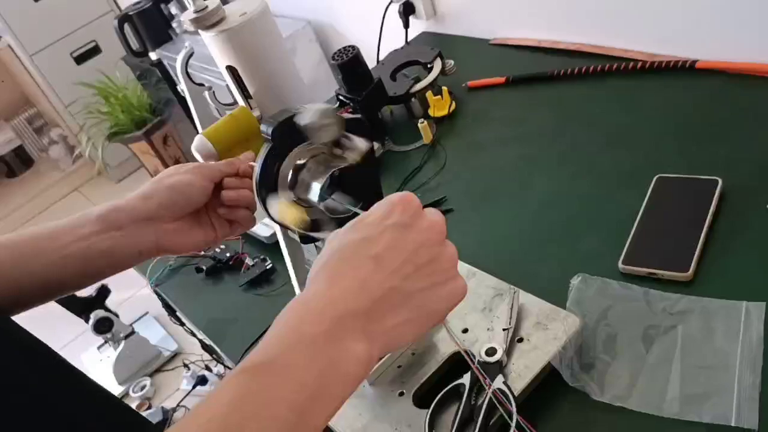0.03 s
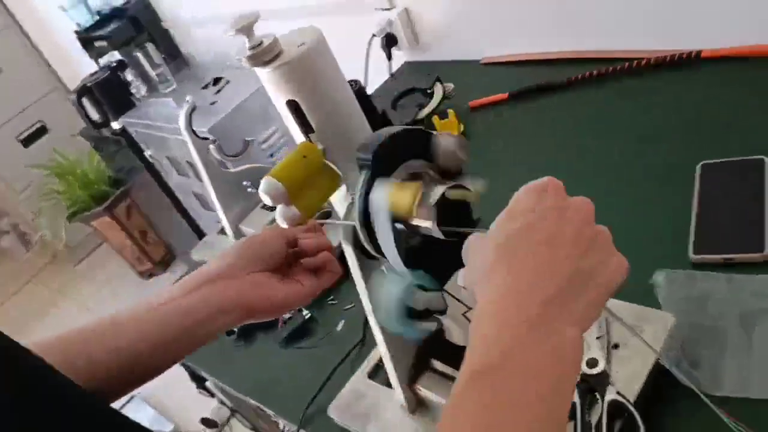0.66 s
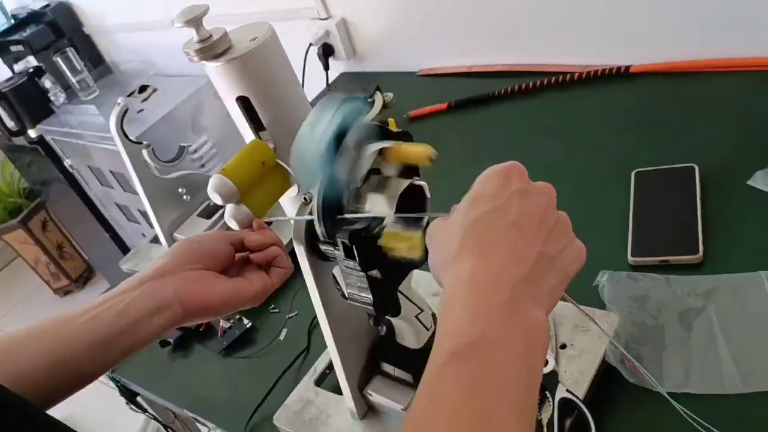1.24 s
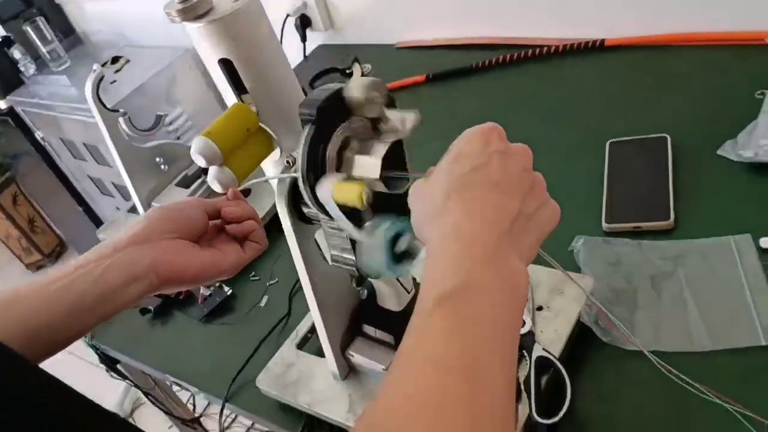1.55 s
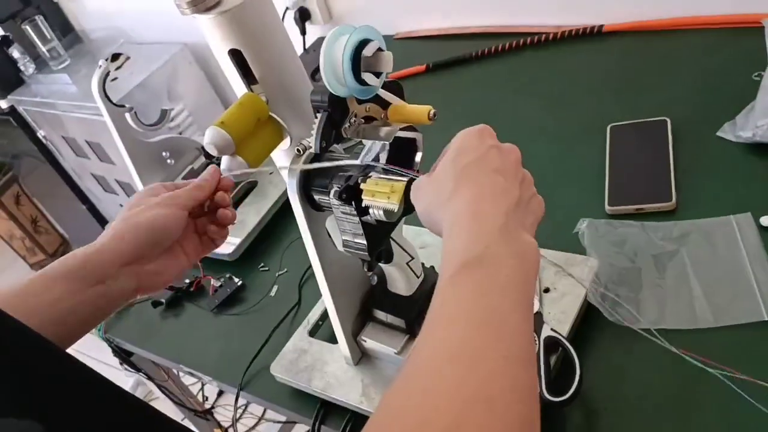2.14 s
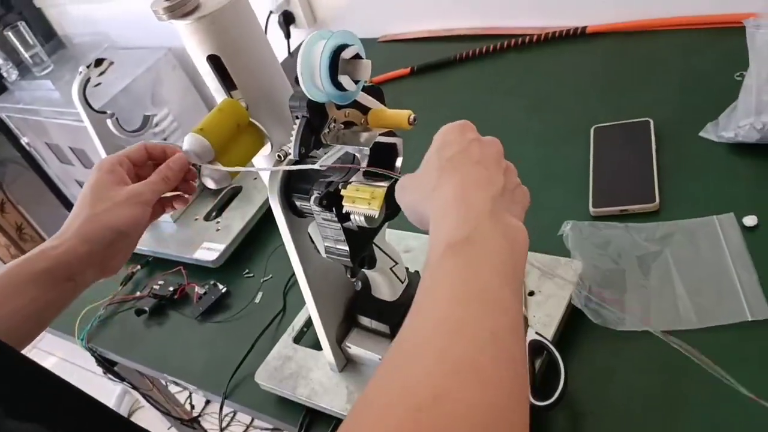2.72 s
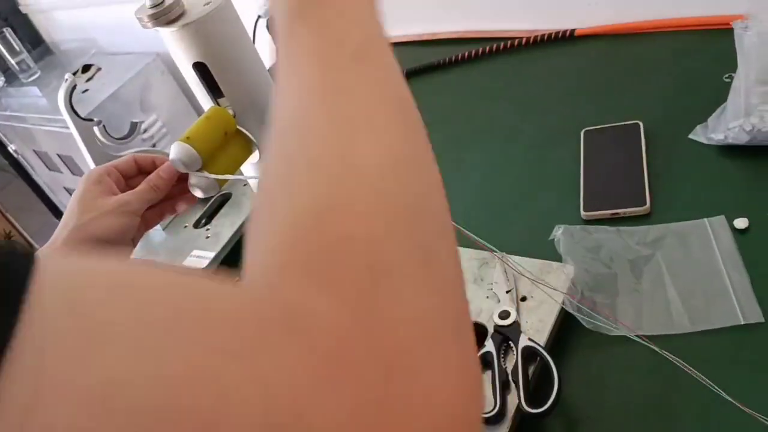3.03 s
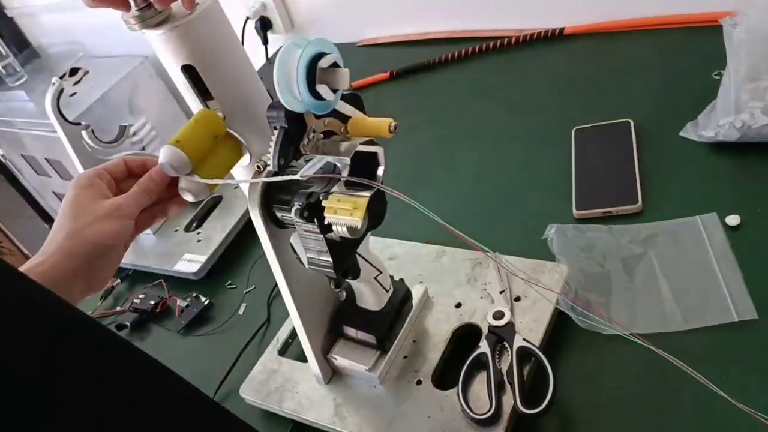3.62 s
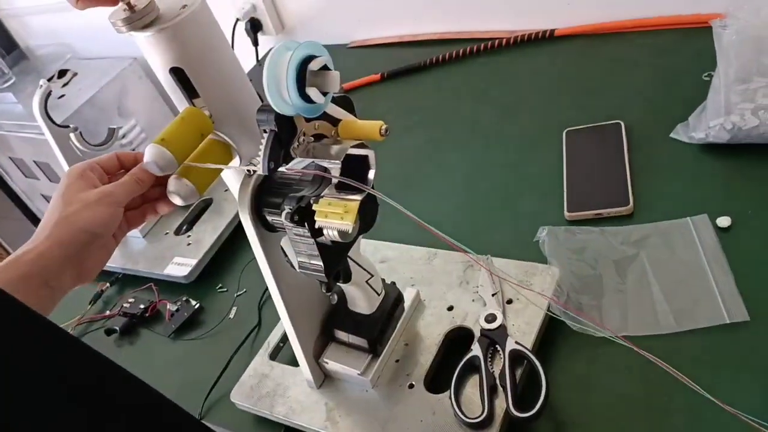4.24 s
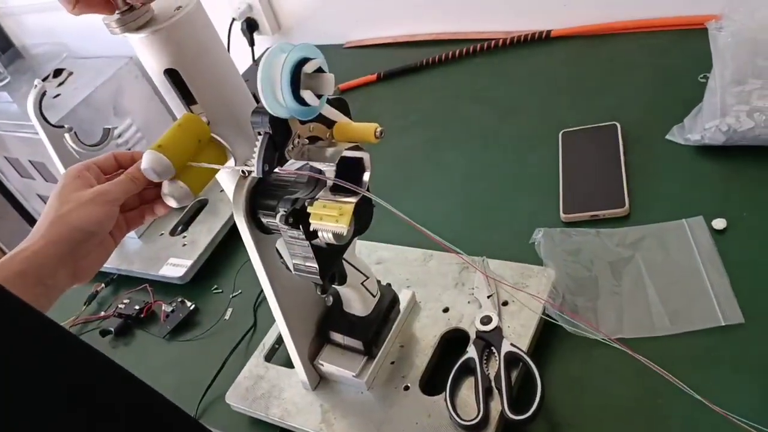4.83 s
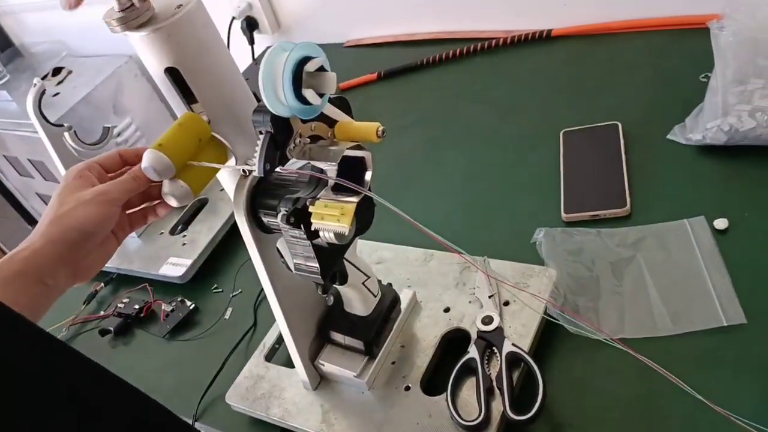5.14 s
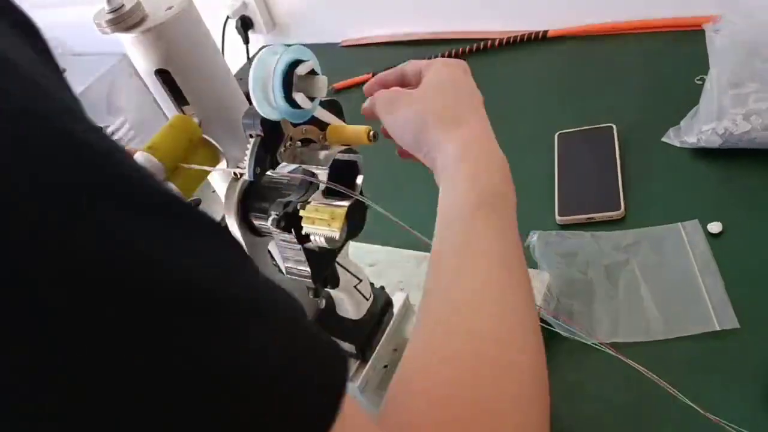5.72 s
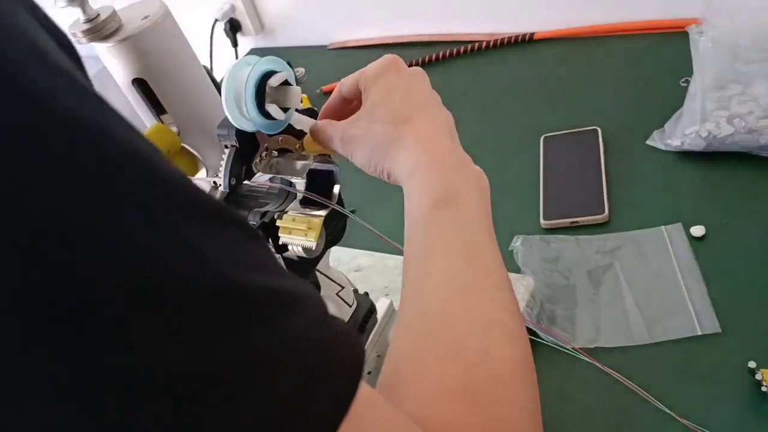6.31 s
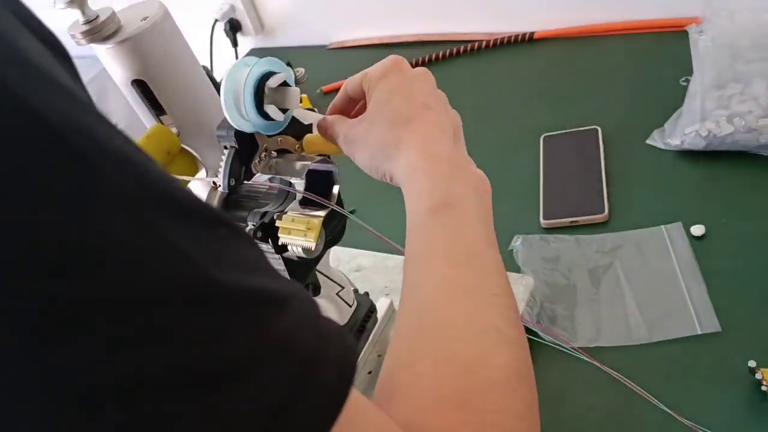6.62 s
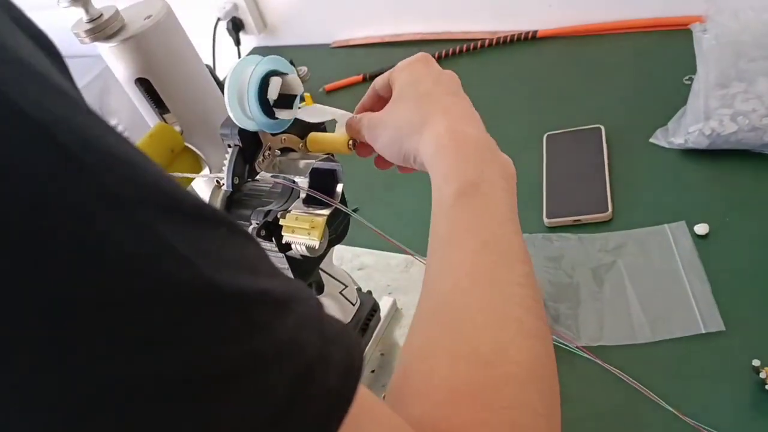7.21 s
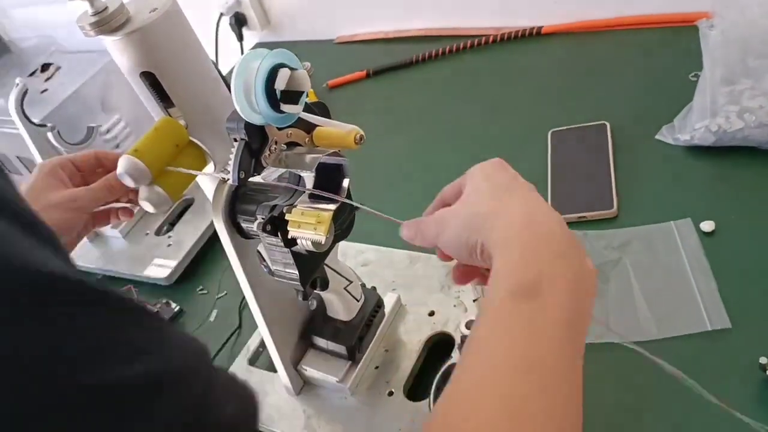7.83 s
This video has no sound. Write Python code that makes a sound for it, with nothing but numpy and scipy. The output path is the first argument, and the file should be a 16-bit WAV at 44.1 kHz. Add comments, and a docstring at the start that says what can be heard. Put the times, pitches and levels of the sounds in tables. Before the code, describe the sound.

Close by in a workshop, a motorised tape winder runs in one loud, short burst, its gears chattering and its tape crackling in pulses. It winds down and clacks to a stop, ringing briefly in the room. The rest is much quieter handling: wire and tape rasping, a few metallic ticks, one heavy clatter, then rubbing and dull bumps on the workbench above a faint machine drone.

```python
"""A small tape winder whirs on a workbench: gear teeth rattle its frame, the motor whines,
and tape crackles off the roll. It slows, stops with a clack, and its noise dies away in the room.
Wire and tape rasp by stick-slip friction; something heavy clatters down and the workshop reverberates.
Scuffs, ringing ticks of the tape arm and soft thumps of the bench sound over far machinery."""
import sys
import numpy as np
from scipy import signal
from scipy.fft import rfft, irfft
from scipy.io import wavfile

SR = 44100
rng = np.random.default_rng(int(sys.argv[2]) if len(sys.argv) > 2 else 0)


def file_out(sig):
    """Save sig as 16-bit WAV at sys.argv[1]."""
    # one column per channel
    cols = np.atleast_2d(sig).T
    # limit, then scale
    lim = np.clip(cols, -1, 1)
    pcm = np.round(lim * 32767).astype(np.int16)
    wavfile.write(sys.argv[1], SR, pcm)


N = 347067
TIME = np.arange(N) / SR
BINS = np.fft.rfftfreq(8192, 1 / SR)

# rotation of the motor shaft: time_s, turns_per_s
SHAFT_SPEED = [(.39, 38.36), (1.0, 37.5), (1.09, 34.5), (1.16, 21.8), (1.33, 19.6)]
# tones of motor and gears: shaft_multiple, level_db
MOTOR_ORDERS = [(3, -44.5), (4, -51), (8, -51), (16, -58), (20, -53.5), (24, -51), (28, -59), (32, -49),
                (40, -45.5), (48, -40.5), (61, -41.5), (80, -41.5)]
# the winding head hits its stop: start_s, level_db
STOP_CLACKS = [(1.3201, -66), (1.3215, -42), (1.335, -48), (1.338, -54.5)]
# spectral envelopes of the sources: frequency_hz, relative_db
FRAME_SPECTRUM = [(30, -38.5), (60, -39), (110, -11), (170, -12), (235, -21.5), (305, -10.5), (410, -24.5),
                  (660, -24), (880, -10.5), (1310, -12), (1770, -6), (2350, -0.5), (3500, -6.5),
                  (5740, -24), (7000, -27), (9100, -44), (15000, -100)]
PEEL_SPECTRUM = [(2940, -36), (5000, -6), (7140, -10.5), (7890, -7.5), (8950, 2.5), (9410, 1.5),
                 (12000, -15), (12400, -23.5), (12500, -38), (16200, -67.5), (22000, -120)]
CLATTER_SPECTRUM = [(25, -43), (60, -14.5), (100, -13.5), (180, -13), (320, -11), (490, -5), (700, -14),
                    (1500, -9), (2700, -2.5), (3200, -8.5), (4000, -25), (5200, -40), (7500, -48.5),
                    (9400, -42), (12000, -74.5)]
RUB_SPECTRUM = [(47, -35.5), (90, -7.5), (150, -10.5), (240, -1.5), (470, -5.5), (700, -9), (1000, -6),
                (1500, -8), (2800, -4), (3250, -10.5), (4100, -24), (5600, -35), (7800, -38), (9400, -26.5),
                (11900, -49)]
SHOP_SPECTRUM = [(24, -55), (40, -19), (112, -3), (169, -12), (243, -2.5), (301, -9), (356, -17),
                 (499, -11), (549, -16.5), (1160, -14), (1510, -20), (2560, -20.5), (5010, -45),
                 (9600, -41), (12500, -46.5), (16200, -70.5), (22000, -120)]
# resonances: centre_hz, width_hz, lift_db
FRAME_MODES = [(1155, 100, 6.5), (1780, 60, 6), (2230, 23, 3.5), (2353, 70, 6), (2990, 50, 1),
               (3004, 99, 4.5), (3600, 680, 3), (4420, 400, 6)]
MOUNT_MODE = (340, 37, 22)
CLATTER_MODES = [(196, 26, 7.5), (510, 50, 5.5), (880, 93, 5.5), (2012, 50, 0), (2436, 26, -1),
                 (2753, 120, 3.5)]
TAUT_TAPE_MODE = (2600, 1300, 5)
SHOP_MODES = [(227, 40, 1.5), (1120, 98, 0.5)]
# rebounds of the heavy object: start_s, level_db, bass_db
BOUNCES = [(3.579, -51, 7), (3.62, -44.5, -3), (3.634, -49.5, -10), (3.785, -64.5, 11), (3.86, -66, 15)]
# the winder's noise dying away in the room after the stop (first row), then light rasps of tape
# and wire: start_s, level_db, rise_s, bass_db, fizz_db
TAIL_AND_RASPS = [(1.36, -44, 0.1, -6.5, 10), (1.729, -42, 0.036, -12.5, 15),
                  (1.869, -52, 0.0093, -5, 22.5), (1.965, -45, 0.013, -6.5, 10.5),
                  (2.12, -53.5, 0.0082, -4, 8), (2.286, -58, 0.012, -18, 26), (2.38, -57, 0.014, -13, 5),
                  (2.527, -41.5, 0.047, -4, 11), (2.705, -49.5, .02, -4, 9.5), (2.835, -50, 0.046, 1, 9.5),
                  (3.08, -58.5, 0.0079, -2, 11.5), (7.77, -83.5, .02, -5, 33.5)]
# hands and parts rubbing the bench: start_s, level_db, rise_s, bass_db, hollow_hz
SCUFFS = [(3.316, -50.5, .008, -10, 450), (3.397, -51, 0.039, 9.5, 332), (3.981, -54.5, 0.0071, -11, 446),
          (4.151, -55.5, 0.023, -3, 411), (4.709, -53, 0.0095, 9, 720), (4.745, -54, 0.016, 8.5, 650),
          (4.943, -47, 0.033, 4.5, 330), (5.02, -48, 0.021, 3, 242), (5.262, -53.5, 0.019, 2, 700),
          (5.531, -49, 0.032, -1, 248), (5.6, -50, .07, 5, 363), (5.74, -46.5, 0.059, 3.5, 355),
          (5.86, -50.5, .04, -1, 247), (6.584, -44, 0.039, -0.5, 247), (7.298, -67.5, 0.014, 5.5, 453)]
# snaps of the tape arm: start_s, level_db, ping_lift_db
ARM_TICKS = [(2.878, -44, -1), (3.321, -57, -2), (4.198, -58, -7), (4.271, -51, -9), (4.346, -54.5, 6),
             (7.561, -76, 8.5)]
# free vibrations of that arm: pitch_hz, relative_db, t60_s
ARM_MODES = [(1430, 0, .075), (1543, 5, 0.038), (2420, -14, .05), (2865, 3.5, 0.039), (5900, -28.5, 0.298),
             (10350, -29, .08)]
# soft pushes on the bench, and the low boom of the heavy object landing (3.572 s row): start_s, level_db,
# pitch_hz
BENCH_THUMPS = [(1.324, -31, 158.2), (2.873, -39, 220.4), (3.572, -29, 174.4), (4.342, -41, 115.5),
                (4.733, -45, 138), (4.791, -51, 100), (5.506, -35, 108.6), (5.544, -30, 108),
                (5.594, -34, 99.6), (6.68, -40.5, 239)]
# course of the background noise: time_s, level_db, treble_db
SHOP_LEVELS = [(1.7, -57.5, 4), (2.4, -63, 9.5), (3.2, -57.5, 3), (4.6, -62.5, 3), (5.45, -60.5, 7),
               (6.15, -63.5, 4.5), (6.5, -58.5, 1.5), (7.15, -63.5, -3.5), (7.87, -65, -6.5)]
# reverberation time of the workshop: frequency_hz, t60_s
ROOM_DECAY = [(100, 1.1), (500, 0.8), (2000, 0.86), (4000, 0.65), (9000, 0.49)]

START_S, STOP_S = .389, 1.345  # the motor's run
# level at the start, change per halving of speed, change with running time
GEAR_DB, GEAR_SLOW_DB, GEAR_EASE_DB_PER_S = -22, -2, -6.5
PEEL_DB, PEEL_SLOW_DB, PEEL_EASE_DB_PER_S = -35, -8.5, -3.5
# the head turns once in GEAR_RATIO shaft turns and tugs the tape each time
GEAR_RATIO, FIRST_TUG_S, TUG_DB, TUG_WIDTH_TURNS = 8.25, 0.4746, 5.5, 0.086
# the heavy object lands corner after corner, each harder and deeper than the last
LANDING_S, CORNER_GAP_S = 3.4617, .0057
FIRST_CORNER_DB, CORNER_GROWTH_DB, FIRST_BASS_DB, BASS_STEP_DB = -47, 4, -7, 1.7
# a stroke that swells for SWELL_S has a decay time of STROKE_T60_S; slower ones linger by a power law
SWELL_S, STROKE_T60_S, LINGER_POWER = 0.025, 0.59, .25


def winder(mesh_depth=0.32, periodic_share=0.25, wander=.005, wet_db=-8, jerk_db=-13, uneven_db=.7):
    """Forced vibration: tooth impacts drive the frame while the motor whines and peeling tape crackles."""
    speed, = follow(SHAFT_SPEED)
    halvings = np.log2(speed.max() / speed)
    run_s = np.clip(TIME, START_S, STOP_S) - START_S
    running = np.clip((TIME - START_S) / 0.0027, 0, 1) * np.clip((STOP_S - TIME) / 0.019, 0, 1)
    speed = speed * (1 + wander * drift(rate_hz=35))
    turns = np.cumsum(speed) / SR
    head_turns = (turns - np.interp(FIRST_TUG_S, TIME, turns)) / GEAR_RATIO
    tug = np.exp(-((head_turns - np.round(head_turns)) / TUG_WIDTH_TURNS) ** 2)
    gear_db = GEAR_DB + GEAR_SLOW_DB * halvings + GEAR_EASE_DB_PER_S * run_s
    gear_db += uneven_db * drift(rate_hz=50)
    tape_db = PEEL_DB + PEEL_SLOW_DB * halvings + PEEL_EASE_DB_PER_S * run_s + TUG_DB * tug
    # the same tooth flaws come round on every turn, among loose random chatter
    flaws = rng.standard_normal(128)
    tooth = (turns * len(flaws)).astype(int)
    meshing = unit_rms(np.diff(tooth, prepend=0) * flaws[tooth % len(flaws)])
    loose = grains(N, per_s=3500, spread_db=2.5)
    chatter = np.sqrt(periodic_share) * meshing + np.sqrt(1 - periodic_share) * loose
    teeth = spinning_head(chatter, head_turns)
    teeth *= 1 + mesh_depth * np.cos(2 * np.pi * 6 * turns + drift(rate_hz=60))
    knocks = unit_rms(teeth) * amp(gear_db) * running
    crackle = grains(N, per_s=7100, spread_db=-2.5) * amp(tape_db) * running
    for start_s, level_db in STOP_CLACKS:  # the stop also jerks the tape
        add(knocks, start_s, amp(level_db) * burst(decay_s=0.0011))
        add(crackle, start_s, amp(level_db + jerk_db) * burst(decay_s=0.044))
    frame = ring(knocks, body(read(FRAME_SPECTRUM) + peaks(FRAME_MODES)))
    noise = frame + ring(crackle, body(read(PEEL_SPECTRUM)))
    return noise + amp(wet_db) * room(noise, build_s=0.0092) + motor_whine(speed, turns) * running


def motor_whine(speed, turns, cut_hz=100, flutter=0.92, clear_hz=400, creep_db=-5, judder=1.2):
    """Rotational harmonics: each swells near the mount's resonance and radiates little below cut_hz."""
    out = np.zeros(N)
    slowed = (speed.max() - speed) / np.ptp(speed)
    play_rad = 1 + judder * np.sin(np.pi * slowed)  # the motor judders while it brakes
    for order, level_db in MOTOR_ORDERS:
        hz = order * speed
        gain = amp(level_db + creep_db * slowed + peaks([MOUNT_MODE], hz)) / (1 + (cut_hz / hz) ** 12)
        unsteady = hz / np.hypot(hz, clear_hz)  # play in the gears smears the high orders most
        jitter = unsteady * play_rad * drift(rate_hz=55)
        phase = 2 * np.pi * (order * turns + rng.random()) + jitter
        out += gain * (1 + unsteady * flutter * drift(rate_hz=45)) * np.sin(phase)
    return np.sqrt(2) * out


def spinning_head(chatter, head_turns, ring_s=0.0086, share=0.49, parts=4):
    """Rotating coupling: the head's parts take up the chatter in turn, each with its own metallic ring."""
    ringing = np.zeros(N)
    for part in range(parts):
        response = rng.standard_normal(len(BINS)) * np.exp(-TIME[:len(BINS)] / ring_s)
        facing = np.maximum(np.cos(2 * np.pi * (head_turns + part / parts)), 0)
        ringing += ring(chatter * facing, response / np.linalg.norm(response))
    return np.sqrt(1 - share) * chatter + np.sqrt(share) * ringing


def clatter(bass_hz=500, wet_db=-1, corners=6):
    """Impact excitation: each corner and rebound of a heavy object sets its modes ringing."""
    out = np.zeros(N)
    landings = [(LANDING_S + k * CORNER_GAP_S,
                 FIRST_CORNER_DB + CORNER_GROWTH_DB * np.log2(k + 1),
                 FIRST_BASS_DB + k * BASS_STEP_DB) for k in range(corners)]
    for start_s, level_db, bass_db in landings + list(BOUNCES):
        response = body(read(CLATTER_SPECTRUM) + peaks(CLATTER_MODES), bass_db * (1 - above(bass_hz)))
        add(out, start_s, amp(level_db) * signal.fftconvolve(burst(decay_s=0.01), response))
    return out + amp(wet_db) * room(out, build_s=0.0034)


def tail_and_scrapes(rasp_bass_hz=1400, scuff_bass_hz=800, fizz_hz=5000, width_hz=130, hollow_db=7):
    """Decaying noise: the winder's room tail, then friction ringing the tape and a hollow in the bench."""
    out = np.zeros(N)
    for start_s, level_db, rise_s, bass_db, fizz_db in TAIL_AND_RASPS:
        shelf_db = bass_db * (1 - above(rasp_bass_hz)) + fizz_db * above(fizz_hz)
        add(out, start_s, amp(level_db) * stroke(rise_s, shelf_db + peaks([TAUT_TAPE_MODE])))
    for start_s, level_db, rise_s, bass_db, hollow_hz in SCUFFS:
        shelf_db = bass_db * (1 - above(scuff_bass_hz))
        resonance_db = peaks([(hollow_hz, width_hz, hollow_db)])
        add(out, start_s, amp(level_db) * stroke(rise_s, shelf_db + resonance_db))
    return out


def stroke(rise_s, colour_db):
    """Shot noise that swells and dies away, like the slips of friction or a room's dense reflections."""
    t = TIME[:SR]
    t60_s = STROKE_T60_S * (rise_s / SWELL_S) ** LINGER_POWER
    swell = np.minimum(t / rise_s, 1) ** .65
    fade = amp(-60 * np.maximum(t - rise_s, 0) / t60_s)
    impulses = grains(SR, per_s=4900, spread_db=-1.0)
    return ring(swell * fade * impulses, body(read(RUB_SPECTRUM), colour_db))


def arm_ticks(snap_db=-26, wet_db=-10, ping_hz=5000):
    """Free vibration: after a snap, the tape arm's modes decay as damped sinusoids."""
    out, t = np.zeros(N), TIME[:SR // 2]
    for start_s, level_db, ping_lift_db in ARM_TICKS:
        tick = np.zeros(len(t))
        for hz, mode_db, t60_s in ARM_MODES:
            envelope = amp(mode_db + ping_lift_db * (hz > ping_hz) - 60 * t / t60_s)
            tick += envelope * np.sin(2 * np.pi * hz * t)
        snap = ring(burst(decay_s=0.015), body(read(RUB_SPECTRUM), colour_db=12 * above(3500)))
        add(tick, 0, amp(snap_db) * snap)
        add(out, start_s, amp(level_db) * tick)
    return out + amp(wet_db) * room(out, build_s=0.015)


def bench_thumps(rise_s=0.017, t60_s=0.28, wobble_rad=.8, wet_db=-10, cut_hz=70):
    """Damped oscillation: the pushed bench top swings unevenly and radiates little deep bass."""
    out, t = np.zeros(N), TIME[:SR]
    for start_s, level_db, pitch_hz in BENCH_THUMPS:
        swing = np.sin(2 * np.pi * pitch_hz * t + wobble_rad * drift(rate_hz=110)[:SR])
        envelope = np.minimum(t / rise_s, 1) * amp(level_db - 60 * t / t60_s)
        add(out, start_s, envelope * swing)
    out = signal.sosfilt(signal.butter(2, cut_hz, "high", fs=SR, output="sos"), out)
    return out + amp(wet_db) * room(out, build_s=.02)


def far_machinery(treble_hz=1700, flutter_db=1.1):
    """Resonant filtering colours the restless noise of far machinery with a low drone."""
    level_db, treble_db = follow(SHOP_LEVELS)
    noise = rng.standard_normal(N) * amp(level_db + flutter_db * drift(rate_hz=130))
    noise = ring(noise, body(read(SHOP_SPECTRUM) + peaks(SHOP_MODES)))
    treble = signal.sosfiltfilt(signal.butter(2, treble_hz, "high", fs=SR, output="sos"), noise)
    return (noise + (amp(treble_db) - 1) * treble) * (TIME > START_S)


def room(x, build_s):
    """Reverberation: diffuse reflections build up, then decay at each band's own rate."""
    reflections = grains(int(1.4 * SR), per_s=5000, spread_db=0)
    hz, t, bands = signal.stft(reflections, SR, nperseg=256)
    decay = amp(-60 * t / read(ROOM_DECAY, hz)[:, None])
    build = 1 - np.exp(-t / build_s)
    _, tail = signal.istft(bands * decay * build, SR, nperseg=256)
    return ring(x, tail / np.linalg.norm(tail))


def burst(decay_s):
    """A brief rough contact is broadband; this one has the energy of one second at rms 1."""
    fade = np.exp(-TIME[:8192] / decay_s)
    spectrum = rfft(rng.standard_normal(len(fade)) * fade)
    contact = irfft(spectrum / abs(spectrum)) * np.sqrt(fade)
    return contact * np.sqrt(SR) / np.linalg.norm(contact)


def grains(size, per_s, spread_db):
    """Shot noise: independent tiny impulses of uneven strength, rms 1."""
    strength = amp(spread_db * np.minimum(rng.exponential(1, size), 4))
    return unit_rms(strength * rng.standard_normal(size) * (rng.random(size) < per_s / SR))


def drift(rate_hz):
    """Random modulation, interpolated between knots, rms 1."""
    knots = rng.standard_normal(2048)
    return unit_rms(np.interp(TIME * rate_hz, np.arange(len(knots)), knots))


def body(spectrum_db, colour_db=0):
    """Minimum-phase impulse response of a spectrum, with energy 1 before colour_db is applied."""
    mean_db = 10 * np.log10(np.mean(amp(spectrum_db) ** 2))
    db = np.maximum(spectrum_db - mean_db + colour_db, -100)
    log_gain = np.log(amp(np.r_[db, db[-2:0:-1]]))
    transfer = np.exp(np.conj(signal.hilbert(log_gain)))
    return np.fft.ifft(transfer).real[:len(BINS)]


def ring(x, response):
    """Convolution of an excitation with an impulse response."""
    return signal.oaconvolve(x, response)[:len(x)]


def peaks(modes, hz=BINS):
    """Resonance: each mode adds a bell-shaped lift in dB."""
    return sum(db / (1 + (2 * (hz - centre) / width) ** 2) for centre, width, db in modes)


def above(hz):
    """High-pass weighting: a soft step from 0 to 1 around hz."""
    return 1 / (1 + (hz / (BINS + 1)) ** 4)


def read(points, hz=BINS):
    """Interpolation on a log-frequency axis."""
    frequency_hz, value = np.transpose(points)
    return np.interp(np.log(hz + 1), np.log(frequency_hz + 1), value)


def follow(rows):
    """Interpolation in time of each column, at every sample."""
    time_s, *columns = np.transpose(rows)
    return [np.interp(TIME, time_s, column) for column in columns]


def add(mix, start_s, sound):
    """Superposition of a sound on the mix, from start_s."""
    part = mix[round(start_s * SR):][:len(sound)]
    part += sound[:len(part)]


def amp(db):
    """Amplitude ratio of a level in decibels."""
    return 10 ** (np.asarray(db) / 20)


def unit_rms(x):
    """Normalisation to rms 1."""
    return x / np.sqrt(np.mean(x ** 2) + 1e-20)


def scene():
    """Superposition: all sources sum at one point, alike in both channels."""
    mono = winder() + tail_and_scrapes() + clatter() + arm_ticks() + bench_thumps() + far_machinery()
    return np.array([mono, mono])


def record(dry, edge_hz=12100):
    """Band limiting: a steep low-pass removes the treble above edge_hz."""
    low_pass = signal.firwin(511, edge_hz, window=("kaiser", 9), fs=SR)
    return signal.oaconvolve(dry, low_pass[None], "same")


dry = scene()
out = record(dry)
file_out(out)
```